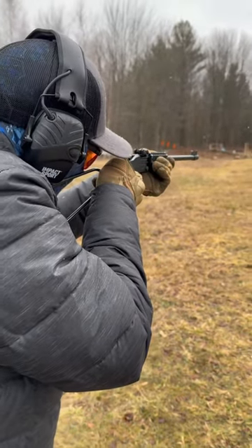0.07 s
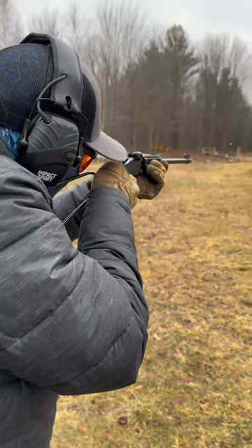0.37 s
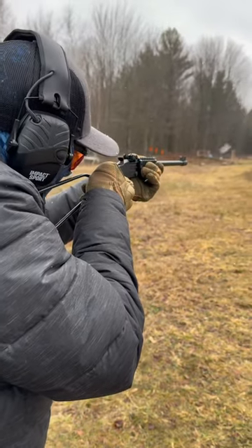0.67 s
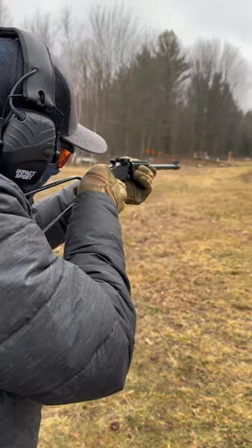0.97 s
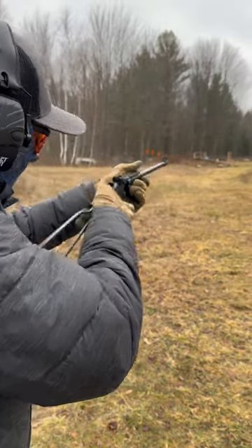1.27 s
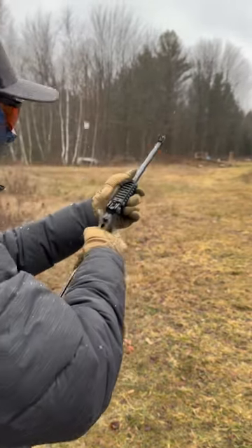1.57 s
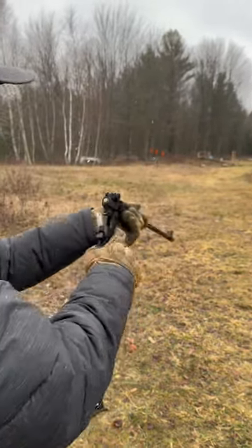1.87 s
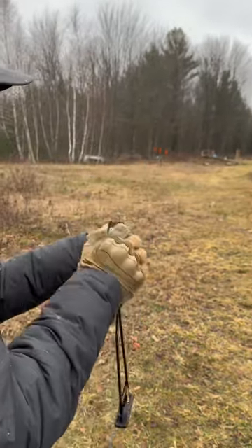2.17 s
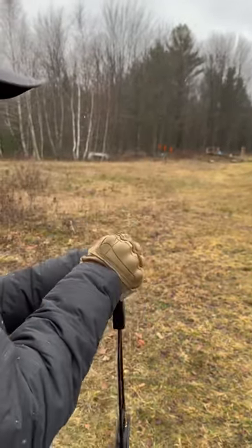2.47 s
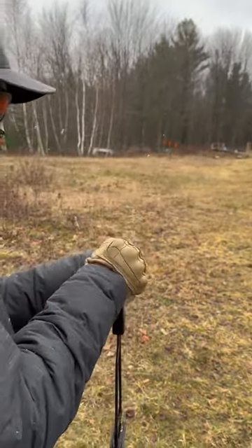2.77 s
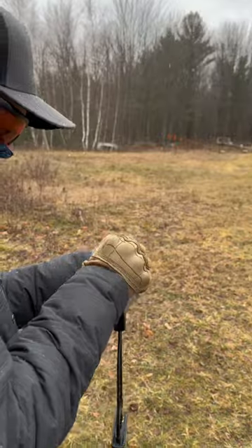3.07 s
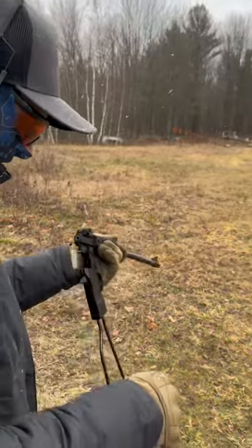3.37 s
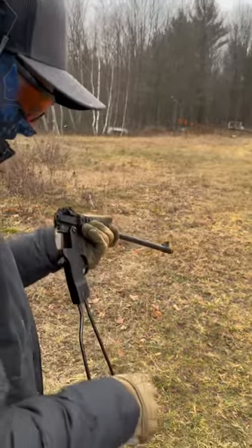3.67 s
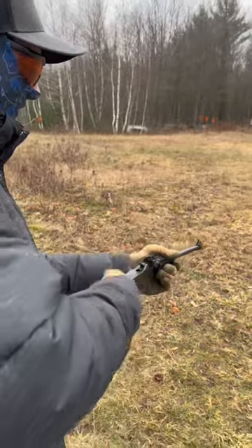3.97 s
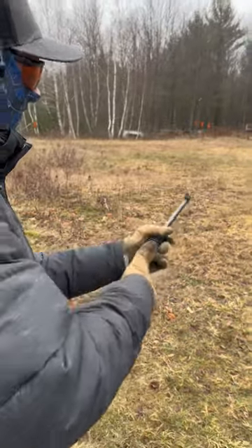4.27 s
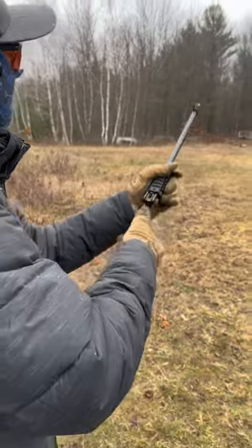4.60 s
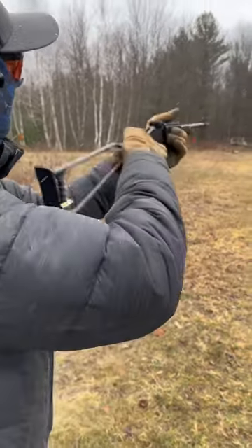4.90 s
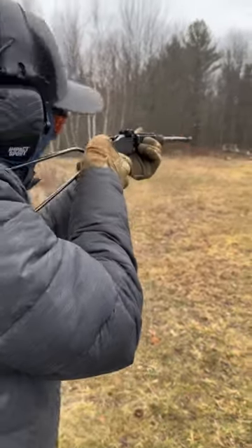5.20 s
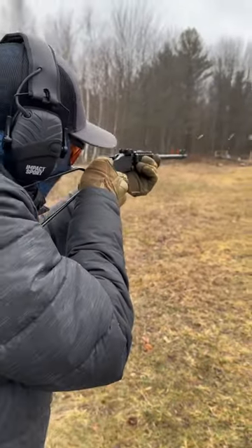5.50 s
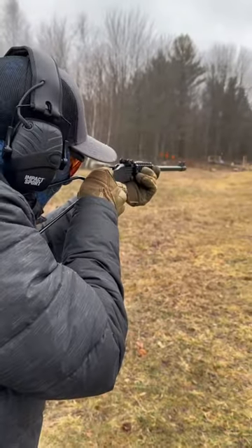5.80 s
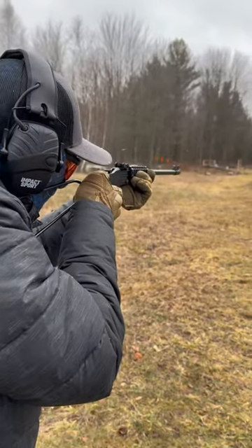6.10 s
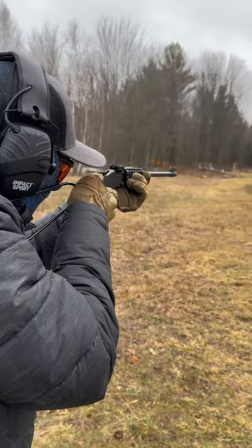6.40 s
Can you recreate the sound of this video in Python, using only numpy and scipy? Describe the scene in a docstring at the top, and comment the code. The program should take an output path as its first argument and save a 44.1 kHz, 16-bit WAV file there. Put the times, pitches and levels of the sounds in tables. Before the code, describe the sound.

A small rifle fires once, close to the microphone, in an open field. The bullet smacks a distant target and a long, darkening echo rolls back from the trees with a thin metallic shimmer. Steel clicks as the action is opened and loaded, then the bolt slams shut. A padded jacket rustles, a few grains of sleet tick on it, and light wind buffets the microphone.

```python
"""A light wind roars softly in the trees and buffets the microphone in an open field.
At 0.5 s a small rifle fires close by, a burst of pressure fronts. The bullet smacks a target, and
the tree line scatters back a long, darkening echo with a thin metallic shimmer. From 1.5 s steel
clicks as the action is opened, loaded and shut, and a padded jacket rustles; the bolt slams home
at 3.9 s. From 5.4 s a few grains of sleet tick on the jacket while the gusts pick up."""
import sys
import numpy as np
from scipy import signal
from scipy.fft import rfft, irfft
from scipy.io import wavfile
from scipy.ndimage import uniform_filter1d

SR = 44100
rng = np.random.default_rng(int(sys.argv[2]) if len(sys.argv) > 2 else 0)


def transcribe(u):
    """Save the signal u as a 16-bit wav file named by the first command-line argument.

    u: samples, shape (n,) or (channels, n), limited to [-1, 1]; the rate is SR.
    q: integer samples, one column per channel.
    """
    v = np.clip(np.atleast_2d(u).T, -1, 1)
    q = np.round(v * 32767).astype(np.int16)
    wavfile.write(sys.argv[1], SR, q)


N = 293265
TIME = np.arange(N) / SR
BINS = np.fft.rfftfreq(N, 1 / SR)


def shot(size=8192, lead_s=0.03, crack=6, bounce_s=0.0015, bounce_gain=0.18):
    """Ragged pressure fronts in quick succession: muzzle blast, ground bounce and cycling bolt."""
    # t/s, level/dB, rise/s, t60/s, treble edge/Hz, left-right likeness
    fronts = [(0.4939, -29.5, 0.0071, 0.06, 8000, 0.29), (0.5008, -17.5, 0.016, 0.094, 8000, -0.18),
              (0.5077, -16.5, 0.0077, 0.057, 8000, -0.28), (0.5100, -17, 0.0028, 0.046, 8000, -0.012),
              (0.5157, -17, 0.0025, 0.036, 19000, 0.85), (0.5218, -24.5, 0.0044, 0.0087, 7000, 1)]
    # tone of the blast: f/Hz, level/dB
    blast_eq = [(60, -11), (230, 1), (600, -2), (1000, -2.5), (1600, -4.5), (1950, -11.5), (2500, -8.5),
                (3500, -15), (4800, -8), (5700, -14), (7400, -13.5), (10000, -19), (15500, -11.5)]
    # its resonances: f/Hz, width/Hz, gain/dB
    blast_modes = [(397.6, 59.5, 2), (550, 70, 10), (654, 120, -2), (1230, 150, 2.5), (1650, 220, 9.5),
                   (3200, 170, 6.5), (3886, 120, 5.5), (4900, 140, 5.5), (5220, 150, 4.5), (6240, 200, 6),
                   (7460, 200, 6.5)]
    out = np.zeros((2, N))
    for s, db, rise, t60, edge_hz, likeness in fronts:
        gas = stereo_white(likeness, size) * swell(TIME[:size] - lead_s, rise, t60)
        gas[:, round(lead_s * SR)] += crack  # the shock itself
        colour = impulse(lambda f: curve(blast_eq, f) + resonances(f, blast_modes) + rolloff(f / edge_hz))
        front = amp(db) * signal.fftconvolve(gas, colour[None])
        add(out, s - lead_s, front)
        add(out, s - lead_s + bounce_s, bounce_gain * front)  # off the shooter's arm: a hollow colour
    return out


def bullet(s=0.6887, db=-23.5, t60=0.023, snap=7):
    """The bullet smacks a distant target: a quick push and pull, then chatter."""
    # tone of the hit: f/Hz, level/dB
    smack_eq = [(150, -14), (700, -12), (1400, -9.5), (1900, -2.5), (2700, -1.5), (3300, -10.5),
                (4200, -15), (5900, -4), (7200, -22), (14500, -13.5), (17000, -21)]
    out, force = np.zeros(N), contact(t60, snap)
    force[round(SR / 4400)] -= snap
    force[round(SR / 2200)] += snap
    add(out, s, amp(db) * signal.fftconvolve(force, impulse(lambda f: curve(smack_eq, f))))
    return out


def echoes(likeness=0.7, patchy_db=1.5, flutter_db=0.58, grain_db=1.0):
    """Grass, brush and trunks scatter the shot back; the longer the path, the less treble is left."""
    # peak t/s, level/dB, rise/s, t60 at 1 kHz/s, treble damping exponent, tilt/dB per octave
    returns = [(0.524, -32.5, .01, 0.14, .1, 5), (0.545, -42.5, 0.04, 0.98, 0.085, 13.5),
               (0.647, -40.5, 0.062, 0.12, 0.084, 5.5), (0.678, -36, 0.026, 0.24, .1, 3),
               (0.786, -36, 0.29, 0.61, 0.17, 3.5), (0.869, -32.5, 0.62, 1.295, 0.23, -1.3),
               (0.872, -39.5, 0.13, 0.18, .3, -16), (1.08, -46, 0.27, 1.34, 0.31, -3.5),
               (1.25, -49.5, 1, 2.56, 0.32, -5)]
    # tone of the tree line: f/Hz, level/dB
    forest_eq = [(60, -18), (250, -20.5), (550, -3.5), (900, 1.5), (1500, 2), (2500, -6), (4000, -11.5),
                 (6000, -13.5), (8500, -20), (11000, -37.5), (15000, -37)]
    trunks = amp(grain_db * wobble(N, 60))  # single returns stand out
    f, t, scatter = signal.stft(unit(trunks * stereo_white(likeness, N)), SR, nperseg=256)
    f, power = f[:, None], 0
    khz = np.maximum(f, 500) / 1000
    for s, db, rise, t60, damping, tilt_db in returns:
        colour = unit(amp(curve(forest_eq, f) + tilt_db * np.log2(khz)))
        power += (amp(db) * colour * swell(t - s, rise, t60 / khz ** damping)) ** 2
    # clumps of trees return stronger patches
    bands = uniform_filter1d(rng.standard_normal(scatter.shape), size=5, axis=0)
    patches = unit(uniform_filter1d(bands, size=4, axis=1))
    texture = amp(patchy_db * patches + flutter_db * wobble(len(t), 3))
    _, tail = signal.istft(scatter * np.sqrt(power) * texture, SR, nperseg=256)
    return tail[:, :N]


def shimmer(s=0.87, rise=0.5, t60=0.67, beat_hz=7, depth=0.8):
    """Close pairs of thin metallic tones beat as they swell and fade with the echo."""
    # f/Hz, level/dB
    tones = [(3090, -53), (4479, -64), (4960, -52), (5819, -62), (6901, -66.5), (7230, -64.5)]
    out = np.zeros(N)
    for (hz, db), (phase, partner_phase, spread) in zip(tones, rng.random((len(tones), 3))):
        partner_hz = hz + beat_hz * (0.5 + spread)
        tone = np.sin(2 * np.pi * (hz * TIME + phase))
        partner = np.sin(2 * np.pi * (partner_hz * TIME + partner_phase))
        out += amp(db) * (tone + depth * partner)
    return out * swell(TIME - s, rise, t60)


def action(knock_width_hz=750, ping_width_hz=800, snap=4):
    """Steel clicks and the stock knocks; each hit adds two resonances to the receiver's."""
    # t/s, level/dB, t60/s, bass edge/Hz, knock f/Hz, knock gain/dB, ping f/Hz, ping gain/dB
    clicks = [(1.5420, -60, 0.025, 8900, 10000, 7, 12000, 8),
              (1.605, -39.5, 0.03, 1900, 2700, 23, 9900, 14),
              (1.6112, -38.5, 0.038, 1950, 2680, -3, 5070, -5),
              (1.734, -49, 0.023, 3970, 5000, -7.5, 9500, -2),
              (1.9194, -40.5, 0.021, 2163, 2500, 6.5, 8900, 3),
              (3.0024, -57, 0.019, 3964, 6060, 2, 12000, -6), (3.5611, -63, 0.019, 4010, 7000, 3, 12000, 8),
              (3.785, -56, 0.019, 500, 846, 31, 1500, 10), (3.8118, -54, 0.011, 1200, 1700, 17, 3110, 13),
              (3.8494, -41, 0.017, 1410, 1700, 9, 11500, -3.5),
              (3.8582, -38, 0.019, 1390, 1710, 9.5, 11600, 9), (3.882, -28, 0.017, 1350, 1640, 1, 5470, 10),
              (3.8834, -19.5, 0.026, 1100, 1730, 9.5, 13900, 13),
              (3.8963, -36.5, 0.028, 1090, 1700, 9, 5700, -2),
              (3.9056, -35, 0.025, 1010, 1736, 15, 3300, 8.5),
              (4.5813, -31.5, 0.019, 1900, 6420, 4, 8630, 16),
              (4.5878, -49.5, 0.062, 1800, 2050, 14, 8700, 3),
              (4.7527, -36.5, 0.016, 1560, 2600, 21, 14000, 14),
              (5.0800, -47, 0.017, 700, 1550, 25, 2660, 11),
              (5.1625, -45.5, 0.016, 504, 900, 29, 2000, 8.5), (5.2395, -43, 0.017, 380, 600, 27, 1850, 17),
              (5.7120, -62.5, .03, 7000, 9040, -10, 13130, 15),
              (6.2185, -60.5, 0.055, 2500, 3420, 11.5, 11820, 6)]
    # the receiver's resonances: f/Hz, width/Hz, gain/dB
    receiver = [(1790, 130, 6), (2080, 110, 6.5), (2650, 88, -3.5), (3594, 81, 7), (3734, 1090, -4.5),
                (5690, 140, 7.5), (6080, 120, 7.5), (7700, 600, 0), (8640, 150, 4), (9160, 247, 7),
                (15000, 1000, -2.5)]
    # springs left ringing by bolt and hammer: t/s, f/Hz, level/dB, t60/s
    springs = [(3.8836, 2260, -60, 0.43), (4.5813, 1990, -49.5, 0.21), (4.582, 4030, -61, 0.11),
               (4.7524, 1990, -64, 0.6)]
    out, t = np.zeros(N), TIME[:SR]
    for s, db, t60, edge_hz, knock_hz, knock_db, ping_hz, ping_db in clicks:
        modes = [*receiver, (knock_hz, knock_width_hz, knock_db), (ping_hz, ping_width_hz, ping_db)]
        body = impulse(lambda f: rolloff(edge_hz / (f + 1)) + resonances(f, modes))
        add(out, s, amp(db) * signal.fftconvolve(contact(t60, snap), body))
    for s, hz, db, t60 in springs:
        add(out, s, amp(db) * swell(t, 1, t60) * np.sin(2 * np.pi * hz * t))
    return out


def bolt(start_s=3.797, stop_s=3.882, db=-56, attack_s=0.048, t60=0.23):
    """The bolt scrapes forward, quickly up to speed; the scrape dies away once it slams home."""
    # sliding steel: f/Hz, level/dB
    scrape_eq = [(600, -17), (1600, 4), (3000, -9), (6000, 0), (8500, -3), (12000, -4), (15500, 1.5)]
    attack = np.clip((TIME - start_s) / attack_s, 0, 1)
    release = swell(np.maximum(TIME - stop_s, 0), 1, t60)
    return amp(db) * attack * release * grainy_noise(scrape_eq, likeness=1, grain_db=2.5)


def jacket(breeze, moves_db=4, hiss_db=-20, hiss_growth=0.69, crinkles_per_s=330, crinkle_db=5):
    """Sleeves rub and crinkle as the arms move; in between, the breeze keeps up a faint hiss."""
    # arm movements: t/s, relative level/dB, length/s
    moves = [(1.76, -85, 0.26), (2.0, -77.5, .15), (2.18, -81.5, 0.095), (3.08, -76.5, 0.23),
             (3.98, -73, 0.16), (4.14, -74, .1), (4.38, -79.5, 0.21), (4.79, -66.5, 0.18),
             (5.06, -63.5, 0.11), (5.2, -74, 0.32)]
    # tone of the cloth: f/Hz, level/dB
    nylon_eq = [(300, -8.5), (1500, 6.5), (3000, -4), (4500, -2.5), (6200, -1), (8500, 0.5), (11000, -8),
                (13000, -1.5), (15000, -6)]
    triggers = rng.random(N) < crinkles_per_s / SR
    snaps = triggers * amp(crinkle_db * np.minimum(rng.exponential(1, N), 3))
    cloth = impulse(lambda f: curve(nylon_eq, f) + rolloff(f / 8000))
    crinkle = unit(signal.fftconvolve(snaps, cloth)[:N])
    rub = grainy_noise(nylon_eq, likeness=1, grain_db=0)
    stir = amp(hiss_db) * breeze.max() * (breeze / breeze.max()) ** hiss_growth
    return np.hypot(amp(moves_db) * humps(moves), stir) * (rub + 0.55 * crinkle)


def sleet(hz=3400, width_hz=2200, boost_db=26, t60=0.014):
    """Grains of sleet tap the jacket's taut cloth."""
    # t/s, level/dB
    grains = [(5.381, -63), (5.4977, -66.5), (5.5361, -70.5), (5.6344, -72), (5.9317, -64.5), (6.1118, -60),
              (6.127, -67), (6.234, -61.5), (6.336, -55), (6.5408, -69)]
    out = np.zeros(N)
    cloth = impulse(lambda f: resonances(f, [(hz, width_hz, boost_db)]))
    for s, db in grains:
        add(out, s, amp(db) * signal.fftconvolve(contact(t60, snap=5.7), cloth))
    return out


def thumps(turns=1.4, sweep_s=0.0015, onset_s=0.003):
    """Pushes of air thump the microphone; each thump sweeps down in pitch as it dies."""
    # t/s, level/dB, t60/s
    pushes = [(0.5200, -16, 0.13), (0.6400, -33.5, 0.16), (0.69, -34, 0.055), (0.733, -35, 0.15),
              (0.762, -33.5, 0.16), (0.7840, -35, 0.14), (2.6530, -42.5, 0.28), (6.436, -42, .13)]
    out, t = np.zeros(N), TIME[:SR // 4]
    swing = np.sin(2 * np.pi * turns * np.log(1 + t / sweep_s))
    attack = 1 - np.exp(-(t / onset_s) ** 2)
    for s, db, t60 in pushes:
        add(out, s, -amp(db) * swing * attack * swell(t, 1, t60))
    return out


def wind(breeze, draught_db=-6, lumpy_db=4, eddy_db=-10, eddy_growth=1.6):
    """An uneven draught and single gusts buffet the microphone; strong ones break into faster eddies."""
    # t/s, level/dB, length/s, rumble relative to the gust/dB
    gusts = [(0.127, -59, 0.037, 4.5), (0.465, -39, 0.069, -7), (0.657, -42, 0.051, -3),
             (0.774, -38.5, 0.052, -8), (1.0, -59, 0.27, -15), (1.225, -50.5, .05, -10),
             (1.415, -57, 0.069, -5), (2.775, -52, .08, 7), (2.96, -57.5, .2, 3), (3.05, -49.5, 0.034, -9),
             (3.131, -51, 0.03, -2), (3.47, -51.5, 0.041, -10), (3.959, -49, 0.058, 1.5),
             (4.542, -53, 0.072, -6), (4.732, -50.5, 0.084, -14), (4.865, -53, 0.037, -12),
             (5.814, -47.5, 0.064, -11), (6.036, -39.5, 0.07, -8.5), (6.241, -37.5, 0.062, -14),
             (6.328, -41, 0.075, -9), (6.455, -38.5, 0.034, -13), (6.555, -36.5, 0.062, -12)]
    # tones of the buffeting, the eddies and the deep rumble: f/Hz, level/dB
    buffet_eq = [(15, -38.5), (35, -11.5), (60, 4.5), (110, 2), (170, -6), (260, -14.5), (400, -31),
                 (900, -50.5), (3000, -80)]
    eddy_eq = [(80, -20), (200, 2), (300, 3), (450, -10), (800, -25), (2500, -57.5)]
    rumble_eq = [(20, -24.5), (38, -9), (56, 0.5), (75, -7), (110, -24), (250, -49), (1000, -95.5)]
    lumps = unit(uniform_filter1d(wobble(N, 2500), size=1500))
    draught = amp(draught_db + lumpy_db * lumps) * breeze
    airflow = np.hypot(draught, humps(row[:3] for row in gusts))
    eddy_gain = amp(eddy_db) * airflow.max() * (airflow / airflow.max()) ** eddy_growth
    rumble_gain = humps((s, db + rumble_db, length) for s, db, length, rumble_db in gusts)
    eddies = eddy_gain * grainy_noise(eddy_eq, likeness=0.73, grain_db=1.5)
    buffet = airflow * noise(buffet_eq, likeness=0.85)
    return buffet + eddies + rumble_gain * noise(rumble_eq, likeness=0.99)


def trees(breeze, db=2):
    """The breeze roars softly in the trees."""
    # f/Hz, level/dB
    roar_eq = [(25, -11.5), (70, -2.5), (250, -8.5), (480, 2.5), (800, 3), (1200, -5), (1700, -16),
               (2500, -30.5), (4000, -36), (9000, -61)]
    return amp(db) * breeze * noise(roar_eq, likeness=0.73)


def microphone_ports(sound):
    """Sound reaches the two ports slightly out of step."""
    # f/Hz, phase by which left leads/rad
    left_lead = [(20, 0), (2500, .15), (4200, 1.1), (6000, 1.05), (8000, 1.55), (10000, 2.3), (11200, 3),
                 (12900, 3.1), (14300, 1.9), (16000, 1.8)]
    phase = np.outer([0.5, -0.5], curve(left_lead, BINS))
    return irfft(rfft(sound) * np.exp(1j * phase), N)


def amp(db):
    """Decibels to gain."""
    return 10 ** (np.asarray(db) / 20)


def unit(x):
    """Scales to an rms of one."""
    return x / np.sqrt(np.mean(x ** 2) + 1e-20)


def add(mix, s, sound):
    """Mixes a sound in at time s."""
    part = mix[..., round(s * SR):][..., :sound.shape[-1]]
    part += sound[..., :part.shape[-1]]


def swell(t, rise, t60):
    """Climbs 60 dB in the rise time up to t = 0, then dies away."""
    return np.exp(-np.log(1000) * np.maximum(-t / rise, t / t60))


def humps(rows):
    """Envelope of smooth swells: t/s, level/dB, length at half power/s."""
    return np.sqrt(sum(amp(db) ** 2 * 0.5 ** np.minimum((2 * (TIME - s) / length) ** 2, 60)
                       for s, db, length in rows))


def curve(points, hz):
    """Reads a curve on a log-frequency axis."""
    f, value = np.transpose(points)
    return np.interp(np.log(hz + 1), np.log(f), value)


def resonances(f, modes):
    """Gain in dB of a body with these modes: f/Hz, width/Hz, gain/dB."""
    return sum(db / (1 + (2 * (f - hz) / width) ** 2) for hz, width, db in modes)


def rolloff(ratio):
    """Gain in dB of a steep filter edge, falling as the ratio passes one."""
    return -10 * np.log10(1 + ratio ** 10)


def impulse(db_at, size=2048):
    """The causal response, of energy one, of a body whose gain is db_at(Hz)."""
    log_gain = np.log(amp(db_at(abs(np.fft.fftfreq(size, 1 / SR)))) + 1e-5)
    response = np.fft.ifft(np.exp(np.conj(signal.hilbert(log_gain)))).real  # minimum phase
    return response / np.linalg.norm(response)


def contact(t60, snap, size=4096):
    """A sharp tick followed by dying chatter."""
    force = rng.standard_normal(size) * swell(TIME[:size], 1, t60)
    force[0] = snap
    return force


def wobble(size, span):
    """Random modulation, smoothed over span steps."""
    return unit(uniform_filter1d(rng.standard_normal(size), span))


def stereo_white(likeness, size):
    """White noise in two partly alike channels."""
    left, other = rng.standard_normal((2, size))
    return np.array([left, likeness * left + np.sqrt(1 - likeness ** 2) * other])


def noise(eq, likeness):
    """Steady stereo noise of a given colour."""
    return unit(irfft(rfft(stereo_white(likeness, N)) * amp(curve(eq, BINS)), N))


def grainy_noise(eq, likeness, grain_db):
    """Coloured noise whose level flickers by about grain_db every few milliseconds."""
    grain = amp(grain_db * wobble(N, 130))
    return unit(noise(eq, likeness) * grain)


def scene():
    """Rifle, target and jacket up front, over a bed of wind."""
    # strength of the breeze, in three stretches: t/s, relative level/dB
    breeze_points = [
        [(0.0, -54), (0.38, -56)],
        [(2.3, -64), (2.558, -65.5), (3.75, -62.5)],
        [(4.1, -60.5), (6.42, -55), (6.6, -57)],
    ]
    breeze = amp(np.interp(TIME, *np.vstack(breeze_points).T))
    gunshot = shot() + echoes() + bullet() + shimmer()
    foley = action() + sleet() + jacket(breeze) + bolt()
    return microphone_ports(gunshot + foley) + thumps() + wind(breeze) + trees(breeze)


def record(dry, ceiling=0.62, cutoff_hz=16300):
    """The shot overloads the microphone softly; a steep low-pass trims the top."""
    saturated = ceiling * np.tanh(dry / ceiling)
    lowpass = signal.firwin(401, cutoff_hz, window=("kaiser", 9), fs=SR)
    return signal.oaconvolve(saturated, lowpass[None], "same")


dry = scene()
out = record(dry)
transcribe(out)
```